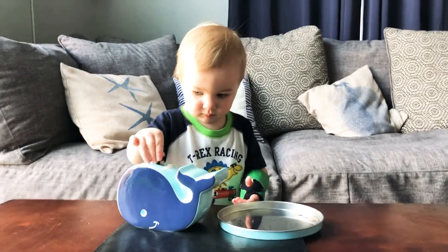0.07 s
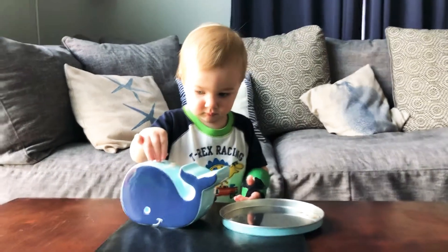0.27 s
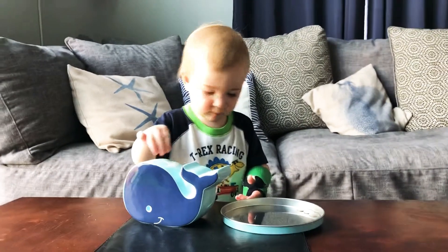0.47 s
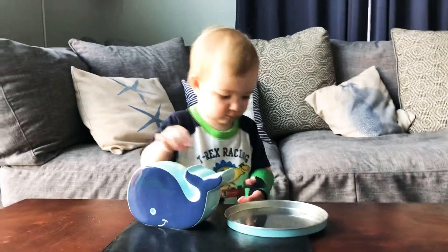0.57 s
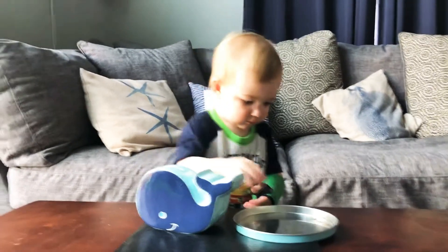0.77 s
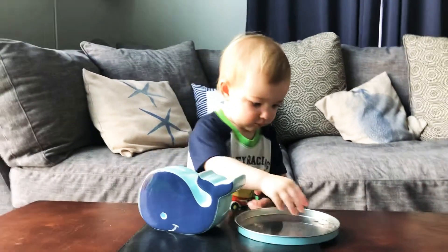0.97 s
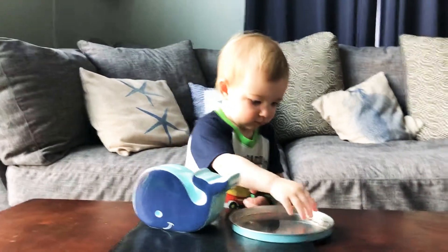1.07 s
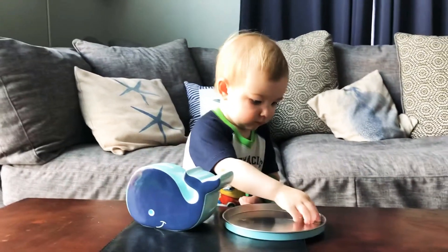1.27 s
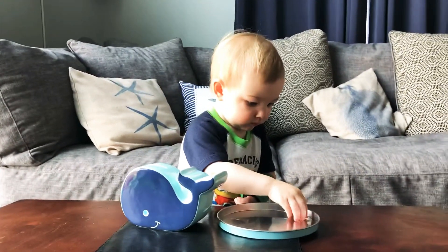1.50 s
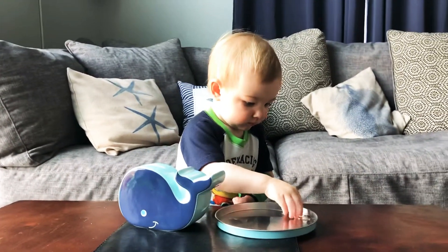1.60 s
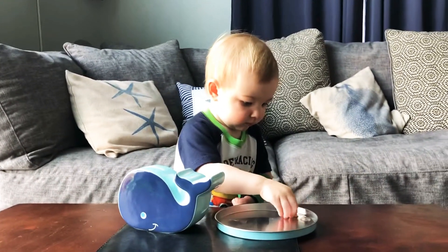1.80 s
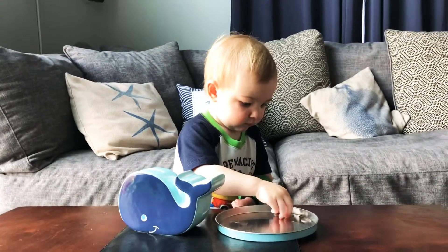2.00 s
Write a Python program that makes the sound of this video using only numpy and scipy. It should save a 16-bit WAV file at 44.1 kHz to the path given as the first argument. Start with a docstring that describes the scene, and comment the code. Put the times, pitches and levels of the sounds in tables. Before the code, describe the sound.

Close by in a quiet living room, a coin clatters into a coin bank, ringing as it bounces with a slight hollow boom. Afterwards, much softer taps, scrapes and thin pings come from coins in a shallow metal dish.

```python
"""A quiet, softly furnished living room with a low hum. A coin rattles in the slot of a hollow
coin bank, drops inside and bounces to rest: each impact excites the modes of bank and coin,
and the heavy landings make the bank boom on its table. A sleeve brushes past, and fingers pick
at coins in a shallow metal dish: damped taps, light friction scrapes and two thin pings.
A faint scrape and two faint taps also precede the rattle."""
import sys
import numpy as np
from scipy import signal
from scipy.fft import rfft, irfft
from scipy.io import wavfile

SR = 44100
rng = np.random.default_rng(int(sys.argv[2]) if len(sys.argv) > 2 else 0)


def digitize_waveform(pressure):
    """Quantize a signal to 16-bit integers and store it at the path in sys.argv[1].

    Rows of a 2-D input are taken as channels; values are limited to [-1, 1].
    """
    field = np.atleast_2d(pressure).T
    bounded = np.clip(field, -1, 1)
    quanta = np.round(bounded * 32767).astype(np.int16)
    wavfile.write(sys.argv[1], SR, quanta)


N = 90404
CLACK_RISE_S = .0007


def amp(db):
    """Amplitude ratio of a level in decibels."""
    return 10 ** (np.asarray(db) / 20)


def unit(x):
    """Normalisation to rms 1."""
    return x / np.sqrt(np.mean(x ** 2) + 1e-20)


def read(points, hz):
    """Interpolation on a log-frequency axis."""
    f, value = np.transpose(points)
    return np.interp(np.log(hz + 1), np.log(f + 1), value)


def add(mix, s, sound):
    """Superposition of a sound starting at time s."""
    part = mix[round(s * SR):][:len(sound)]
    part += sound[:len(part)]


def octaves(hz):
    """Interval in octaves from the middle of the coin range, constant below 800 Hz."""
    return np.log2(np.maximum(hz, 800) / 6000)


def noise(spectrum):
    """Spectral shaping of white noise, at rms 1."""
    gain = amp(read(spectrum, np.fft.rfftfreq(N, 1 / SR)))
    return unit(irfft(rfft(rng.standard_normal(N)) * gain, N))


def fade(t, t60):
    """Exponential damping: 60 dB in t60 seconds."""
    return np.exp(-np.log(1000) * t / t60)


def burst(spectrum, t60, rise_s, tilt_db=0, size=8192):
    """Modal overlap: many close modes struck at once act as decaying noise, filtered by the body."""
    t, hz = np.arange(size) / SR, abs(np.fft.fftfreq(size, 1 / SR))
    crack = 1 + np.exp(-t / .0014)  # extra bite in the first instant
    envelope = fade(t, t60) * crack * np.minimum(t / rise_s, 1)
    gain = unit(amp(read(spectrum, hz) + tilt_db * octaves(hz)))
    body = np.exp(signal.hilbert(np.log(gain)).conj())  # causal, minimum-phase response
    return np.fft.ifft(np.fft.fft(rng.standard_normal(size) * envelope) * body).real


def swells(rows):
    """Gaussian envelopes of smooth strokes, summed."""
    t = np.arange(N) / SR
    return sum(amp(db) * np.exp(-((t - s) / half) ** 2) for s, half, db in rows)


def background():
    """Broadband room air and a narrowband hum, which wavers as its components interfere."""
    # room air spectrum (frequency [Hz], relative level [dB])
    air = [(20, -48), (34, -24.5), (60, -2.5), (90, -10.5), (130, -5.5), (190, -9), (300, -12), (800, -22),
           (1400, -25.5), (2200, -25.5), (2700, -31.5), (5400, -32), (16000, -37.5)]
    hum_hz, width_hz, hum_db, air_db = 91.4, 9.6, -62, -63.5
    t, hz = np.arange(N) / SR, np.fft.rfftfreq(N, 1 / SR)
    phases = np.exp(2j * np.pi * rng.random(len(hz)))
    band = signal.hilbert(irfft(phases / (1 + (2 * (hz - hum_hz) / width_hz) ** 2), N))
    power = abs(band) ** 2
    hum = unit(band.real / np.sqrt(power + .5 * power.mean()))  # partly evens out the wavering
    opening = amp(np.interp(t, [.178, .192], [-4, 0]))  # softer at first
    return amp(air_db) * noise(air) * np.sqrt(opening) + amp(hum_db) * hum * opening


def scrapes():
    """Stick-slip friction: dense tiny slips of a coin on metal, each stroke with its own colour."""
    # finger strokes (centre time [s], half width [s], level [dB], strongest band [Hz])
    strokes = [(0.057, 0.068, -71.5, 2840), (1.274, 0.057, -62, 2660), (1.407, 0.03, -61, 3350),
               (1.522, 0.057, -73, 3600), (1.775, 0.025, -66, 3800), (1.868, 0.016, -60, 4280),
               (1.908, 0.02, -62.5, 3850), (1.943, 0.015, -66.5, 2240), (2.011, 0.036, -62.5, 4400),
               (2.011, 0.023, -63.5, 2150)]
    # spectrum of a slip (frequency [multiple of the strongest band], relative level [dB])
    slip_spectrum = [(.05, -11), (.35, -9.5), (.7, -5.5), (1, 2.5), (1.4, -6.5), (2.5, -14.5), (5, -27.5)]
    slips_per_s, spread_db = 3700, 4.5
    slips = (rng.random(N) < slips_per_s / SR) * rng.standard_normal(N)
    slips *= amp(spread_db * np.minimum(rng.exponential(1, N), 3))
    out = np.zeros(N)
    for s, half, db, band_hz in strokes:
        grain = burst(np.array(slip_spectrum) * [band_hz, 1], t60=.03, rise_s=.0002, size=2048)
        out += unit(signal.oaconvolve(slips, grain)[:N]) * swells([(s, half, db)])
    return out


def taps():
    """Damped impact: fingers and coins tap the dish, and the fingers cut its ring short."""
    # light contacts (time [s], level [dB], tilt [dB/octave])
    contacts = [(.066, -58.5, 7.5), (.121, -64, -5), (.773, -56.5, -10.5), (1.22, -42, 0.5),
                (1.258, -53, -3), (1.506, -62.5, -6), (1.753, -63, 0), (1.8849, -56, 0)]
    # response of the dish (frequency [Hz], relative level [dB])
    dish = [(200, -15.5), (800, -10), (1700, -2.5), (2800, 2.5), (4200, 2.5), (5500, -1.5), (9000, 1),
            (12000, -9.5), (16000, -6)]
    out = np.zeros(N)
    for s, db, tilt_db in contacts:
        add(out, s, amp(db) * burst(dish, t60=.043, rise_s=.0003, tilt_db=tilt_db))
    return out


def knocks(rows, clack, clack_t60, mode_db, t60):
    """Impulse excitation: each knock clacks and kicks the modes in quadrature, so energies add."""
    # modes of bank and coin (frequency [Hz])
    mode_hz = [1986, 2071, 2857, 3043, 3680, 3891, 4194, 4687, 4905, 4990, 6047, 6293, 7650, 7895, 8571,
               8946, 9245, 9543, 10526, 11230, 11567, 12117, 13188]
    spot_db = 1.5  # each knock strikes a new spot, so its modes vary in level
    out, t, hz = np.zeros(N), np.arange(SR) / SR, np.array(mode_hz)
    modes = np.exp(2j * np.pi * hz[:, None] * t) * fade(t, t60[:, None])
    swing, last_s = 1e-9 * np.exp(2j * np.pi * rng.random(len(hz))), rows[0][0]
    for s, db, tilt_db, ring_db, ring_tilt_db in rows:
        swing = swing * modes[:, round(abs(s - last_s) * SR)]  # free decay since the last knock
        scatter_db = spot_db * rng.standard_normal(len(hz))
        strength = amp(ring_db + mode_db + ring_tilt_db * octaves(hz) + scatter_db)
        kick = strength * np.exp(1j * np.angle(swing)) * rng.choice([-1j, 1j], len(hz))
        add(out, s, amp(db) * burst(clack, clack_t60, CLACK_RISE_S, tilt_db))
        add(out, s, (kick @ modes).real * np.minimum(t / CLACK_RISE_S, 1))
        swing, last_s = swing + kick, s
    return out


def bank():
    """Modal ringing under repeated impact: the coin chatters in the slot, drops and bounces to rest."""
    # modes, ascending in pitch (level struck inside [dB], level struck at the slot [dB], t60 [s])
    modes = [(-16, -27, .24), (-5, -8, 0.11), (-15, -12, 0.25), (-12.5, -18.5, 0.36), (-19, -30, .27),
             (-13.5, -8.5, 0.13), (-23.5, -24, 0.27), (-9.5, -10.5, 0.24), (-15, -24, 0.12),
             (-19, -11.5, 0.26), (-12, -16.5, 0.073), (-15, -8.5, .18), (-6.5, -16, 0.058), (-17, -8, 0.15),
             (1, -1, 0.12), (-9.5, -18, .12), (-15, -11, .15), (-24, -9, .15), (-13.5, -10, 0.13),
             (-13, -23.5, .1), (-10.5, -8.5, 0.081), (-12.5, -19.5, 0.19), (-9.5, -21.5, 0.032)]
    # slot impacts (time [s], clack [dB], clack tilt [dB/octave], ring [dB], ring tilt [dB/octave])
    chatter = [(.1868, -40.5, -2.5, -38.5, -2.5), (.197, -42.5, -1.5, -41.5, -1.5),
               (.205, -43.5, 0, -42.5, -2), (.2115, -38.5, -1, -39.5, 0.5), (.219, -40.5, -1.5, -39, -1),
               (.2245, -40.5, 2.5, -41.5, 2), (.2297, -27.5, -1.5, -28.5, 3.5), (.243, -32, 2, -38, 6.5),
               (.300, -61.5, -6.5, -59, -7.5)]
    # impacts inside, with the same columns
    bounces = [(.347, -12, -2, -22, 0.5), (.3893, -30.5, -1, -33, 4), (.398, -33, -3, -44, 7.5),
               (.404, -27, -2, -30.5, 0), (.4422, -38, 0, -42.5, -6.5), (.4613, -23.5, -3, -27.5, -1),
               (.465, -23.5, 3.5, -31, 4.5), (.470, -29, 6, -34, 6), (.4754, -27, 2.5, -34.5, -1.5),
               (.483, -29, 4, -45, 7), (.5245, -32.5, -6.5, -36.5, -2.5), (.543, -37.5, -5.5, -44, -1)]
    # clack spectra of slot, inside and wall (frequency [Hz], relative level [dB])
    slot = [(200, -23), (1500, -29), (2400, -22.5), (3000, -11.5), (4800, -5.5), (7000, -2), (8800, 3),
            (11800, -7.5), (13000, -19.5), (15500, -13.5)]
    inside = [(200, -37), (650, -38.5), (1550, -27), (1800, -18), (2100, -6.5), (2500, -23), (2950, -11.5),
              (3300, -22), (3700, -3.5), (4250, -18), (4800, -1), (5400, -16), (6100, 0), (7200, -6),
              (7700, 7), (8100, -5), (8800, 4), (9700, -7), (11500, -2.5), (13200, -3), (15500, -7.5)]
    wall = [(200, -37.5), (1500, -31), (1720, -6), (2250, -2.5), (2450, -26), (6000, -45)]
    drop_s, drop_db, rest_s, rest_t60 = .347, -23, .559, .43
    inside_db, slot_db, t60 = np.transpose(modes)
    out = knocks(chatter, slot, clack_t60=.02, mode_db=slot_db, t60=.48 * t60)  # the ring dies away faster here
    out += knocks(bounces, inside, clack_t60=.054, mode_db=inside_db, t60=t60)
    add(out, drop_s, amp(drop_db) * burst(wall, t60=.018, rise_s=CLACK_RISE_S))  # the wall's hard tock
    lying_s = np.maximum(np.arange(N) / SR - rest_s, 0)
    return out * fade(lying_s, rest_t60)  # lying flat adds damping


def boom():
    """Coupled low modes of the hollow bank on its table swell and beat."""
    # low modes (frequency [Hz], level [dB], t60 [s])
    low_modes = [(252.7, -2, 0.13), (274.2, -11, .5), (325.7, -9.5, 0.096)]
    # heavy landings that rock the bank (time [s], level [dB])
    landings = [(0.3492, -26.5), (0.4683, -33), (.522, -42)]
    rise_s = .0177
    out, t = np.zeros(N), np.arange(SR) / SR
    hollow = sum((-1) ** k * amp(db) * np.sin(2 * np.pi * hz * t) * fade(t, t60)
                 for k, (hz, db, t60) in enumerate(low_modes))
    for s, db in landings:
        add(out, s, amp(db) * hollow * np.minimum(t / rise_s, 1))
    return out


def sleeve():
    """Friction noise: cloth hisses softly as the arm reaches over."""
    # cloth spectrum (frequency [Hz], relative level [dB])
    cloth = [(300, -5), (2000, 2), (6000, 4), (11000, -3), (16000, 1.5)]
    # passes of the sleeve (centre time [s], half width [s], level [dB])
    rustles = [(.86, 0.097, -70.5), (1.12, 0.12, -67.5)]
    return noise(cloth) * swells(rustles)


def clicks():
    """Hard, brief contact gives a bright transient: coin strikes coin."""
    # collisions (time [s], level [dB])
    collisions = [(1.7208, -50), (1.7248, -55), (1.726, -52), (1.732, -56), (1.8906, -47)]
    # click spectrum (frequency [Hz], relative level [dB])
    spectrum = [(300, -21), (3800, -28.5), (5500, 4.5), (9000, -5.5), (12000, -7), (16000, -7.5)]
    out = np.zeros(N)
    for s, db in collisions:
        add(out, s, amp(db) * burst(spectrum, t60=.0099, rise_s=.0001))
    return out


def pings():
    """Mode splitting: a loose coin rings in close pairs of modes, which beat."""
    # lower mode of each pair (time [s], frequency [Hz], level [dB], t60 [s])
    rings = [(1.7222, 5980, -58.5, 0.19), (1.7222, 11210, -58.5, 0.21), (1.7222, 15020, -67, .17),
             (1.8903, 12940, -63, 0.07)]
    split_hz, twin_db = 16.6, 3
    out, t = np.zeros(N), np.arange(SR // 2) / SR
    for s, hz, db, t60 in rings:
        pair = np.sin(2 * np.pi * hz * t) + amp(twin_db) * np.sin(2 * np.pi * (hz + split_hz) * t)
        add(out, s, amp(db) * pair * fade(t, t60))
    return out


def room(x, wet_db):
    """Reverberation: the direct sound plus a diffuse tail whose treble is absorbed first."""
    # reverberation time (frequency [Hz], t60 [s])
    decay = [(200, .75), (2000, .62), (3000, .36), (5000, .42), (8500, .25), (15000, .17)]
    reflections = rng.standard_normal(SR) * (np.arange(SR) > .004 * SR)
    hz, t, bands = signal.stft(reflections, SR, nperseg=256)
    tail = signal.istft(bands * fade(t, read(decay, hz)[:, None]), SR, nperseg=256)[1]
    return x + amp(wet_db) * signal.fftconvolve(x, tail / np.linalg.norm(tail))[:N]


def scene():
    """Superposition of all sources in one channel."""
    coins = bank() + taps() + clicks() + pings() + scrapes()
    return (room(coins, wet_db=-12) + room(boom(), wet_db=-20.5) + sleeve() + background())[None]


def record(dry):
    """Band limiting: a steep low-pass removes the highest treble."""
    edge_hz = 15850
    lowpass = signal.firwin(511, edge_hz, window=("kaiser", 9), fs=SR)
    return signal.oaconvolve(dry, lowpass[None], "same")


dry = scene()
out = record(dry)
digitize_waveform(out)
```